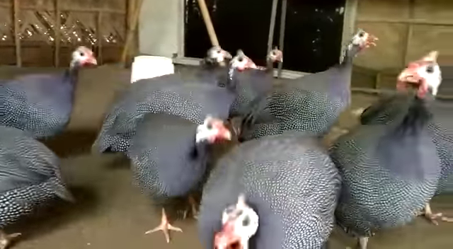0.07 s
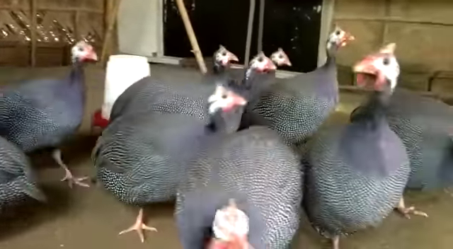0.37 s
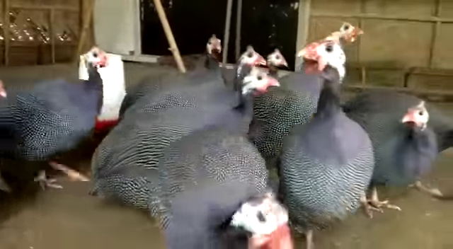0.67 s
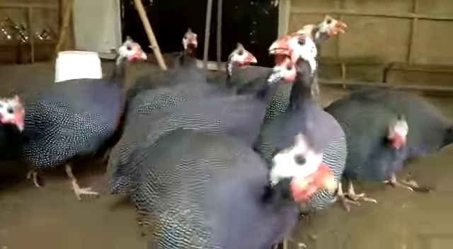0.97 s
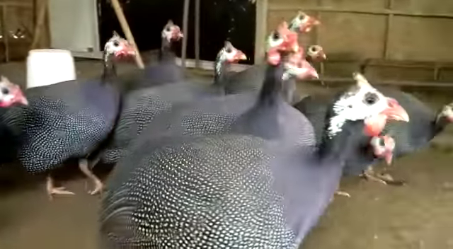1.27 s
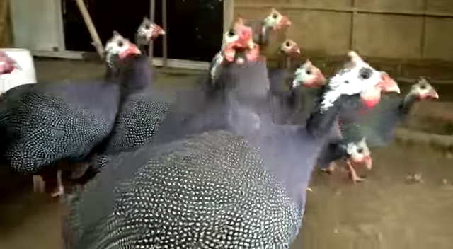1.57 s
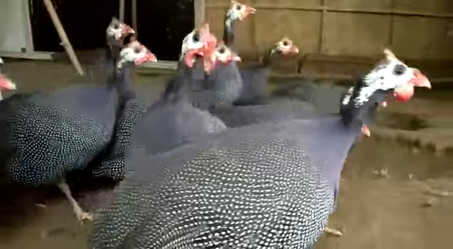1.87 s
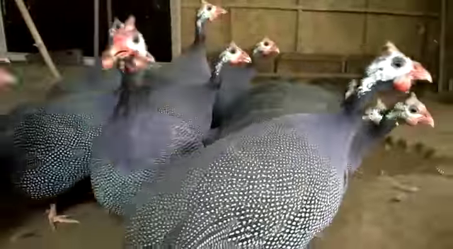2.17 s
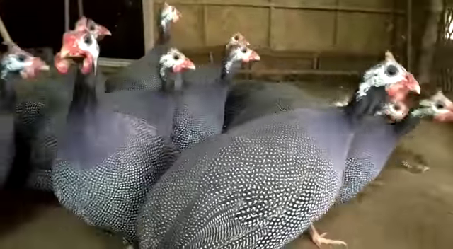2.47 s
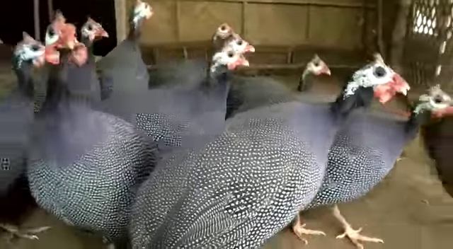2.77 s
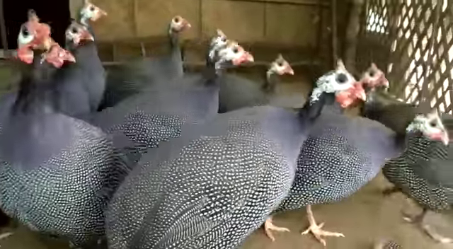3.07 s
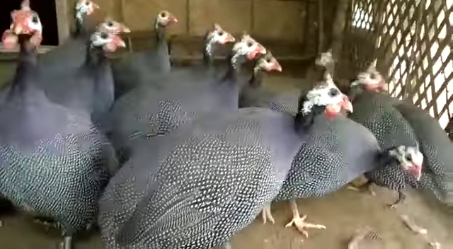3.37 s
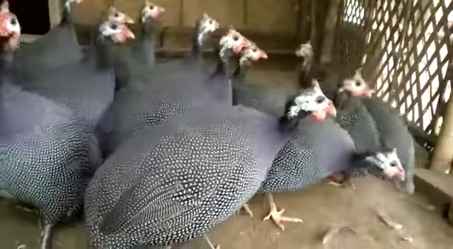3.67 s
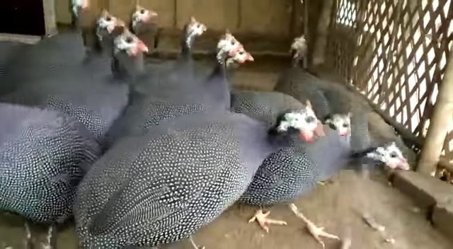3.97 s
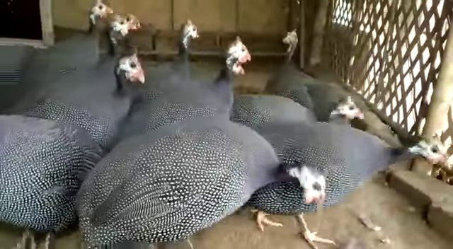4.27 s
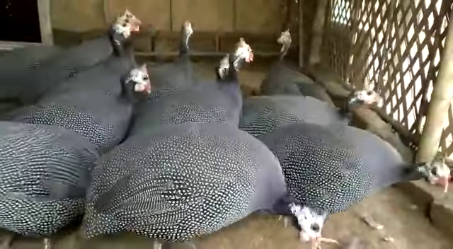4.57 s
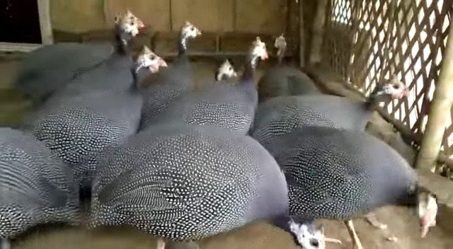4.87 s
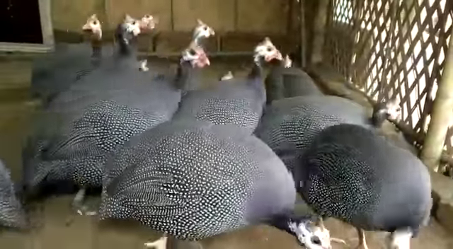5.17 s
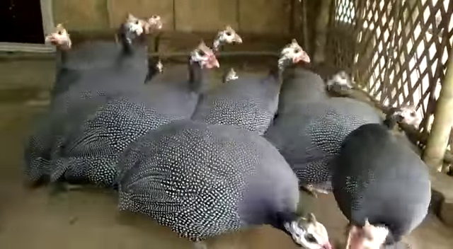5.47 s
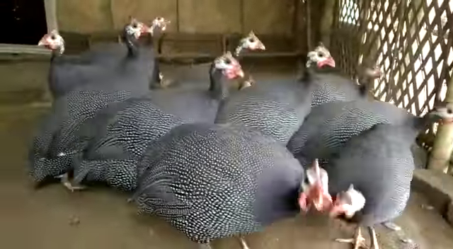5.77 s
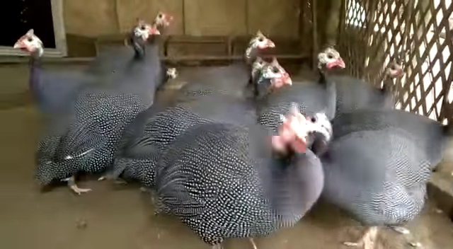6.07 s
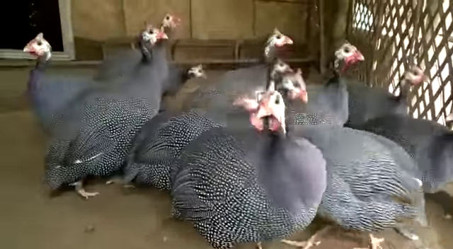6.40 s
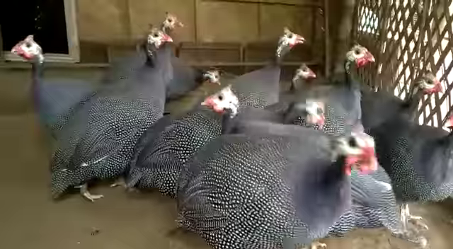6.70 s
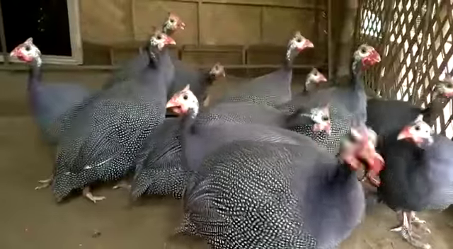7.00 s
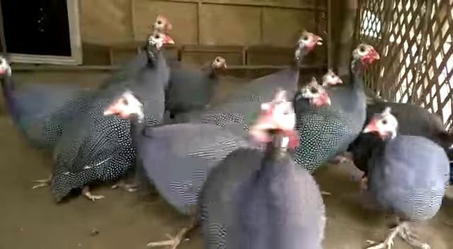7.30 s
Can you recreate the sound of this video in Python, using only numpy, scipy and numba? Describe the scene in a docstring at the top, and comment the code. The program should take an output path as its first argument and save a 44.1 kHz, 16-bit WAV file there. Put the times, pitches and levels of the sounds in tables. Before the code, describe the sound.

A flock of guinea fowl calls close to a stereo microphone in a small shed. Short, harsh, nasal rasps alternate irregularly with quick clucks and sharp, high chips, several a second, and a few start with a thin whistle. The calling carries on throughout with only brief gaps. The walls add a short reverberation, while faint cheeping from farther birds and a quiet low rumble lie underneath.

```python
"""A flock of guinea fowl calls in a small shed, close to a stereo microphone.
Each voice is a source and a filter: the syrinx emits a pulse train near 1 kHz, and windpipe, throat and
beak resonate. An open beak gives clucks and harsh chips; weakening two pulses in three triples the
period and gives a nasal rasp. Thin whistles lead into some calls. The walls reverberate briefly,
over far cheeping, a low rumble and a fading drone. A limiter holds down the highest peaks."""
import sys
import numpy as np
from scipy import signal
from scipy.fft import rfft, irfft, next_fast_len
from scipy.io import wavfile
from scipy.ndimage import uniform_filter1d, minimum_filter1d
from numba import njit

SR = 44100
rng = np.random.default_rng(int(sys.argv[2]) if len(sys.argv) > 2 else 0)


def wav_out(sig):
    """Save sig, one row per channel (or a flat mono array), as 16-bit PCM at SR to the path in sys.argv[1]."""
    wavfile.write(sys.argv[1], SR, np.round(np.clip(np.atleast_2d(sig).T, -1, 1) * 32767).astype(np.int16))


N = 328104

# Calls, at nominal pitch and level. Tripling and roughness run 0-1; lag is that of the left channel.
# Rasps, in which the half-closed throat opens once: t/s, length/s, time to opening/s, closed pitch/Hz,
# open pitch/Hz, open throat resonance/Hz, closed level/dB, open level/dB, tripling, roughness,
# relative fundamental level/dB, relative treble level/dB, lag/ms
RASP_CALLS = [(0.572, 0.092, 0.058, 1072, 1138, 1700, -27, -27, .8, 0.6, -7, -0.5, -.02),
              (0.917, 0.1, 0.032, 919, 995, 1860, -15.5, -18, 1, 0.16, -16, -8, -.07),
              (1.22, 0.2, 0.0077, 1037, 1013, 2880, -20, -30.5, 0.84, 0.47, -19, -7.5, 0),
              (1.35, 0.092, .05, 1106, 1057, 1900, -25, -29.5, 0.87, 0.47, -10, -4, .04),
              (1.743, 0.12, 0.063, 931, 997, 1850, -16, -17.5, 0.85, 0.23, -2.5, -6.5, .05),
              (1.916, 0.07, .031, 907, 944, 1280, -13, -25.5, 0.53, 0.17, -16, -4, -.09),
              (2.2, 0.09, 0.013, 1037, 1103, 1900, -33, -30.5, 1, 0.5, -10, -1, .07),
              (2.715, 0.12, 0.059, 937, 1063, 1690, -22.5, -17.5, .85, 0.36, -13, -5, .07),
              (3.425, 0.064, 0.029, 987, 957, 1240, -26, -20.5, 0.53, 0.51, -11, -10.5, .14),
              (3.572, 0.15, 0.053, 945, 1055, 1645, -28.5, -18, 1, 0.33, -29, -4, .07),
              (3.708, 0.098, 0.03, 929, 1131, 1770, -22, -21, 0.89, 0.44, -5, -0.5, .07),
              (3.925, 0.11, 0.059, 918, 1104, 1330, -29.5, -38, .8, 0.25, -11, -2.5, .07),
              (4.39, 0.13, 0.069, 972, 971, 2000, -20, -12.5, 0.7, 0.37, -17, -7, .2),
              (4.545, 0.078, 0.021, 1000, 1019, 1710, -24, -14, 0.86, 0.62, -15, -6, .2),
              (5.13, 0.089, 0.059, 934, 919, 1080, -26, -20.5, 0.8, 0.7, -5, -4, .05),
              (5.27, 0.1, .04, 925, 1019, 1550, -20, -24.5, 1, .18, -4, -0.5, -.05),
              (5.362, 0.096, .04, 932.6, 960.4, 1630, -22.5, -18.5, 0.5, 0.3, -15, -1, -.05),
              (5.487, 0.086, .065, 941, 1070, 1440, -27, -32.5, 1, 0.2, -24, -0.5, -.09),
              (5.964, 0.09, 0.034, 996, 1010, 1670, -21.5, -22.5, 0.8, 0.77, -9, 4.5, -.07),
              (6.035, 0.054, 0.038, 991, 942, 1400, -20.5, -28, 0.7, 0.49, -5, -8.5, -.07),
              (6.191, .13, 0.0493, 951.4, 963.4, 1640, -22, -18.5, 0.53, 0.3, -6.5, 0, .05),
              (6.666, 0.092, .044, 957, 1097, 1810, -20.5, -18, 0.99, .27, -12, 1, -.09),
              (6.745, 0.072, 0.049, 984, 1070, 1440, -22, -41, 0.95, 0.36, -16, -12, -.09),
              (6.981, 0.17, 0.06, 973, 1100, 1710, -21, -17.5, 0.96, 0.27, -17, 1.5, .04),
              (7.185, 0.069, .04, 938, 914, 1280, -21, -26.5, .7, 0.52, 5, -3, -.05),
              (7.319, 0.12, 0.041, 944, 1077, 1730, -21.5, -20.5, 1, 0.26, -10, 3, -.05)]
# Clucks: t/s, length/s, pitch/Hz, roughness, fundamental level/dB, overtone level/dB,
# beak resonance/Hz, top level/dB, lag/ms
CLUCK_CALLS = [(0.038, 0.062, 921, 0.55, -31, -20, 2080, -42, -0.14),
               (0.472, 0.047, 969, 0.49, -23, -15, 2880, -26.5, -0.09),
               (0.7, 0.026, 965, 0.27, -20.5, -14.5, 2600, -24, 0.02),
               (0.773, 0.018, 935, 0.16, -24, -36, 2730, -55, -0.18),
               (1.202, 0.075, 957, 0.33, -29, -24, 3380, -44.5, 0.07),
               (1.589, 0.037, 910, 0.16, -20, -39.5, 4950, -38, 0.0),
               (2.062, 0.03, 983, 0.32, -25, -35.5, 5300, -45, 0.0),
               (2.443, 0.044, 943.6, 0.46, -25, -14, 2470, -29, -0.18),
               (2.566, 0.038, 948, 0.43, -25.5, -34, 5230, -45.5, 0.07),
               (2.71, 0.015, 1021, 0.9, -27.5, -7, 2930, -19.5, 0.2),
               (2.87, 0.039, 966, 0.31, -26, -32.5, 5400, -48, 0.02),
               (2.941, 0.05, 1324, 0.15, -35.5, -44.5, 2920, -51, 0.02),
               (3.01, 0.083, 959, 0.51, -26.5, -21, 3330, -27.5, -0.05),
               (3.31, 0.182, 985, 0.19, -35, -26, 2700, -52, 0.14),
               (4.043, 0.019, 963, 0.38, -25, -10, 2850, -26.5, 0.18),
               (4.272, 0.056, 916, 0.4, -23.5, -36.5, 5200, -35.5, 0.05),
               (4.486, 0.072, 990, 0.66, -30.5, -21.5, 3170, -31, 0),
               (4.677, 0.033, 952, 0.1, -29.5, -15.5, 2750, -25, -0.07),
               (5.3, 0.064, 956, 0.59, -25, -17, 3560, -29.5, -0.07),
               (5.808, 0.03, 1000, 0.37, -21, -15, 2880, -20.5, -0.05),
               (6.835, 0.072, 941.6, 0.61, -24, -15.5, 2920, -28, 0.25),
               (7.146, 0.025, 898, 0.72, -22.5, -15, 3300, -23.5, -0.11)]
# Chips: t/s, length/s, level/dB, beak resonance/Hz, top level/dB, lag/ms
CHIP_CALLS = [(0.004, 0.023, -13.5, 2920, -24.5, 0.037), (0.073, 0.029, -18.5, 3000, -41, -0.031),
              (1.013, 0.026, -12, 3100, -39, -0.014), (1.27, 0.023, -13.5, 2840, -30, -0.095),
              (1.634, 0.025, -14, 3150, -29.5, 0.01), (2.182, 0.026, -12.5, 3150, -23.5, 0.14),
              (3.03, 0.027, -10.5, 2700, -24, -0.16), (3.567, 0.026, -10, 3240, -26.5, 0.096),
              (4.105, 0.022, -13, 3100, -27, -0.07), (5.118, 0.026, -11.5, 2780, -30, 0.32),
              (5.871, 0.023, -11, 2600, -26.5, 0.28), (6.352, 0.021, -12.5, 2950, -24.5, 0.0),
              (6.538, 0.026, -9, 3220, -20.5, 0.084)]
# Whistles: t/s, length/s, first pitch/Hz, last pitch/Hz, level/dB, roughness
WHISTLE_CALLS = [(0, 0.009, 2470, 3380, -6, 0.42), (0.458, 0.034, 1350, 1190, -29, .08),
                 (0.557, 0.043, 1278, 1132, -28.5, 0.04), (1.46, 0.071, 3510, 2960, -37.5, 0.23),
                 (3.297, 0.0405, 1149, 1012, -31, 0.07), (3.929, 0.053, 1233, 1276, -26.5, 0.02),
                 (5.517, .05, 1225, 1398, -26.5, 0.13), (2.171, 0.013, 2640, 3430, -14.5, 0.17),
                 (2.192, 0.011, 2920, 2940, -11.5, .1), (3.553, 0.0214, 2690, 3440, -22, 0.37),
                 (5.105, 0.02, 2980, 3400, -22.5, 0.15), (1.006, 0.021, 3490, 4110, -21.5, 0.3),
                 (4.096, 0.0201, 3300, 3970, -19, 0.3), (6.342, 0.013, 4060, 3800, -17.5, 0.15),
                 (6.525, 0.021, 2570, 3920, -19, 0.5)]

# Filter curves of the voice, each f/Hz, gain/dB
NASAL_FILTER = [(500, -45), (760, -24), (900, 4), (1100, -3), (1300, -1), (1550, -2), (1900, 2), (2200, -3),
                (2800, 0), (3400, -14), (4500, -35)]  # middle band of a rasp
RASP_TREBLE_FILTER = [(2500, -57), (3500, -8), (4150, -5), (4650, 7), (5400, 2.5), (6300, -6),
                      (7500, -10.5), (8700, -3), (10200, -4), (11700, -9), (13200, -18.5), (15000, -31)]  # upper band of a rasp
CHEST_FILTER = [(150, -13), (280, -27), (375, 8.5), (500, -11), (700, -8.5), (900, 2.5), (1500, -23.5)]  # low partials that pass through the neck
FUNDAMENTAL_FILTER = [(350, -18), (600, -23), (780, -18), (930, -1), (1350, -1.5), (1600, -9), (2500, -54)]  # band around the pulse rate
OVERTONE_FILTER = [(700, -17), (1250, -71), (1600, 2), (1950, 0), (2400, 2), (3000, -5.5), (4100, -3),
                   (5100, -1.5), (6000, -10.5), (7500, -26)]  # harmonics of a cluck
CHIP_FILTER = [(700, -11.5), (1000, 7), (1350, 2), (1650, 4), (2300, 2), (2800, 0), (3400, 1.5),
               (4100, 6.5), (5300, 7), (6300, -5.5), (7500, -17)]  # body of a chip
BEAK_TOP_FILTER = [(4500, -33), (6600, -5.5), (7500, -10.5), (8300, 2.5), (9000, 7.5), (10000, -0.5),
                   (11500, -6.5), (13500, -13.5), (15500, -23)]  # highest band of clucks and chips

# Spectra of the background, each f/Hz, relative spectral density/dB
RUMBLE_SPECTRUM = [(25, 4.5), (50, 4), (80, 0.5), (130, -4), (250, -8), (500, -12), (1000, -27),
                   (2000, -59), (5000, -37), (8000, -34), (15000, -48)]
DRONE_SPECTRUM = [(58, -14), (73, 6), (100, 14), (140, -30)]
CHEEPING_SPECTRUM = [(1200, -7), (2100, -5.5), (2900, 1.5), (3900, 0.5), (4700, -9), (7000, -9.5),
                     (9000, -7), (14000, -23)]
# Envelopes of the background, each t/s, relative level/dB
RUMBLE_ENVELOPE = [(0, -50.5), (2.1, -50.5), (7.44, -54.5)]
DRONE_ENVELOPE = [(0, -52), (1.4, -53), (2.1, -70)]
CHEEPING_ENVELOPE = [(0, -47.5), (1.5, -40.5), (2.4, -40.5), (3.25, -41.5), (4.8, -43.5), (4.95, -43.5),
                     (5.08, -46), (7.44, -36.5)]
# Reverberation of the shed by band: f/Hz, T60/s, relative level/dB
SHED_BANDS = [(410, 0.21, 2), (690, 0.45, -16.5), (1160, 0.16, -3.5), (2130, 0.23, -4), (3240, 0.26, -1.5),
              (4630, 0.2, -0.5), (8200, 0.21, 2), (14200, 0.11, 6)]
# Polarity of a side signal in the left and right channels
SIDE_SIGN = np.array([[1], [-1]])


def amp(db):
    """Amplitude ratio of a level in decibels."""
    return 10 ** (np.asarray(db) / 20)


def unit(x):
    """Normalisation to an rms of 1."""
    return x / np.sqrt(np.mean(x ** 2))


def steady(x):
    """Running normalisation: the short-term rms stays at 1 and single pulses survive."""
    return x / np.sqrt(np.abs(uniform_filter1d(x ** 2, size=600)) + 1e-12)


def colour(x, curve):
    """Zero-phase filtering by a curve (f/Hz, gain/dB), falling 12 dB an octave below its first point."""
    n = next_fast_len(len(x) + 1024)
    hz, db = np.transpose(curve)
    freqs = np.maximum(np.fft.rfftfreq(n, 1 / SR), 1)
    gain = amp(np.interp(np.log(freqs), np.log(hz), db)) * np.minimum(freqs / hz[0], 1) ** 2
    return irfft(rfft(x, n) * gain, n)[:len(x)]


@njit
def resonance(x, hz, width_hz):
    """A driven, damped resonator of moving frequency, as a state-variable band-pass."""
    y, band_state, low_state = np.empty(len(x)), 0., 0.
    for i in range(len(x)):
        g, damping = np.tan(np.pi * hz[i] / SR), width_hz / hz[i]
        band = (band_state + g * (x[i] - low_state)) / (1 + g * (g + damping))
        band_state, low_state = 2 * band - band_state, low_state + 2 * g * band
        y[i] = damping * band
    return y


def walk(n, rate_hz):
    """Random modulation: interpolated Gaussian values with a standard deviation near 1."""
    steps = np.arange(n) * rate_hz / SR
    knots = int(steps[-1]) + 2
    return 1.238 * np.interp(steps, np.arange(knots), rng.standard_normal(knots))


def clock(length):
    """Uniform sampling times over a length in seconds."""
    return np.arange(int(length * SR)) / SR


def gate(t, attack_s, release_s):
    """A raised-cosine envelope for the onset and end of a call."""
    ramp = np.clip(np.minimum(t / attack_s, (t[-1] - t) / release_s), 0, 1)
    return np.sin(np.pi / 2 * ramp) ** 2


def level_db(envelope):
    """Linear interpolation of an envelope (t/s, level/dB) over the scene."""
    return np.interp(np.arange(N) / SR, *np.transpose(envelope))


def add(out, sound, start, lag_ms=0):
    """Superposition of a call, with a difference in arrival time between the two channels."""
    for channel, sign in enumerate((1, -1)):
        at = max(int(start * SR) + round(sign * lag_ms * SR / 2000), 0)
        part = sound[:max(N - at, 0)]
        out[channel, at:at + len(part)] += part


def rumble(trim_db=1, side_gain=0.2):
    """Low filtered noise with faint air above it, largely coherent between the channels."""
    mid, side = (unit(colour(rng.standard_normal(N), RUMBLE_SPECTRUM)) for _ in range(2))
    return (mid + side_gain * side * SIDE_SIGN) * amp(level_db(RUMBLE_ENVELOPE) + trim_db)


def drone():
    """A distant drone of narrow-band noise, in phase in both channels, that dies away early."""
    return unit(colour(rng.standard_normal(N), DRONE_SPECTRUM)) * amp(level_db(DRONE_ENVELOPE))


def far_cheeping(trim_db=-1, flicker_db=0.92, width_hz=180.):
    """Distant birds merge into incoherent noise with a wandering resonance and a flickering level."""
    centre_hz = 3200 * amp(2.25 * walk(N, 19))
    cheeps = [unit(colour(noise + 0.5 * resonance(noise, centre_hz, width_hz), CHEEPING_SPECTRUM))
              for noise in rng.standard_normal((2, N))]
    return np.array(cheeps) * amp(level_db(CHEEPING_ENVELOPE) + trim_db + flicker_db * walk(N, 34))


def shed_reverberation(dry, gap_s=0.0019, build_s=0.0013):
    """Reflections from floor and walls form a diffuse field; each band decays exponentially."""
    t = clock(.6)
    log_centres = np.log([row[0] for row in SHED_BANDS])
    freqs = np.maximum(np.fft.rfftfreq(len(t), 1 / SR), 1)
    mid, side = rfft(rng.standard_normal((2, len(t))))
    coherence = np.sinc(freqs / 3200)  # long waves reach both channels alike
    field = (mid * np.sqrt(1 + coherence) + SIDE_SIGN * side * np.sqrt(1 - coherence)) / np.sqrt(2)
    response = 0
    for share, (_, t60, db) in zip(np.eye(len(SHED_BANDS)), SHED_BANDS):
        decay = amp(-60 * t / t60) * np.clip((t - gap_s) / build_s, 0, 1)
        band = irfft(field * np.interp(np.log(freqs), log_centres, share), len(t))
        response = response + amp(db) * band * decay / np.sqrt(np.sum(decay ** 2))
    return signal.fftconvolve(dry, response, axes=1)[:, :N]


def windpipe(x, ripple_db=7.5, mean_delay_s=.002):
    """Close-set tube resonances ripple both the gain and the group delay, smearing each pulse."""
    n = next_fast_len(len(x) + 1024)
    freqs = np.fft.rfftfreq(n, 1 / SR)
    ripple = np.interp(freqs, np.linspace(0, SR / 2, 60), rng.uniform(-1, 1, 60))
    phase = -2 * np.pi * np.cumsum(mean_delay_s * (1 + ripple)) * SR / n
    return irfft(rfft(x, n) * amp(ripple_db * ripple) * np.exp(1j * phase), n)[:len(x)]


def syrinx(hz, tripling, rough, jitter, scatter_db):
    """A pulse train drives the windpipe; roughness scales its jitter, shimmer and breath noise."""
    n = len(hz)
    cycles = np.cumsum(hz * (1 + jitter * rough * walk(n, 700))) / SR
    cycle = cycles.astype(int)
    # weakening two pulses in three puts partials at multiples of a third of the pulse rate
    size = np.where(cycle % 3, np.clip(1 - tripling, .02, 1) ** 1.3, 1)
    size = size * amp(scatter_db * rough * rng.standard_normal(cycle[-1] + 1)[cycle])
    offset = cycles % 1 - .5
    pulses = np.sinc(offset * SR / hz * 3 / 4) * np.cos(np.pi * offset) ** 2  # band-limited
    puff_decay = np.exp(-((cycles + .5) % 1) / 0.44)  # a puff of air follows each pulse
    puffs = puff_decay * uniform_filter1d(size, size=40) * rng.standard_normal(n)
    return windpipe(steady(size * pulses) + rough * steady(puffs))


def whistle(length, first_hz, last_hz, db, rough, overtone_db=-23):
    """A nearly pure glide, roughened by random frequency and amplitude modulation."""
    t = clock(length)
    hz = np.linspace(first_hz, last_hz, len(t)) * (1 + 0.086 * rough * walk(len(t), 1580))
    phase = 2 * np.pi * np.cumsum(hz) / SR
    tone = np.sin(phase) + amp(overtone_db) * (np.sin(2 * phase) + np.sin(3 * phase))
    flutter = 1 + 1.4 * rough * walk(len(t), 1510)
    return amp(db) * unit(tone * flutter) * gate(t, attack_s=0.0097, release_s=0.0055)


def chip(length, db, beak_hz, top_db, pitch_hz=1000, beak_width_hz=650., sweep=0.19):
    """A swept formant on a harsh, breaking voice: the beak resonance falls, then springs back."""
    t = clock(length)
    arch = np.sin(np.pi * t / t[-1])
    hz = pitch_hz * (1 + 0.1504 * np.exp(-t / 0.00661))
    source = syrinx(hz, tripling=1.0, rough=0.58, jitter=0.0804, scatter_db=3.5)
    beak = resonance(source, beak_hz * (1 - sweep * (arch - .5)), beak_width_hz)
    body = amp(db) * steady(colour(beak + 0.18 * source, CHIP_FILTER))
    top = amp(top_db) * unit(colour(source, BEAK_TOP_FILTER))
    return (body + top) * arch ** 2


def cluck(length, pitch_hz, rough, fundamental_db, overtone_db, beak_hz, top_db,
          beak_width_hz=1500., sag_db=4):
    """A stationary beak formant shapes the harmonics of a short note whose pitch drops into place."""
    t = clock(length + 0.0017)
    # a soft note with the beak shut swells and settles more slowly
    slowness = amp(0.3 * max(fundamental_db - overtone_db, 0))
    hz = pitch_hz * (1 + 0.22 * np.exp(-t / (0.0061 * slowness)))
    source = syrinx(hz, tripling=0.037 + 0.86 * rough, rough=rough, jitter=.09, scatter_db=0)
    beak = resonance(source, np.full(len(t), float(beak_hz)), beak_width_hz) + 0.063 * source
    fundamental = amp(fundamental_db) * steady(colour(source, FUNDAMENTAL_FILTER))
    overtones = amp(overtone_db) * steady(colour(beak, OVERTONE_FILTER))
    top = amp(top_db) * steady(colour(source, BEAK_TOP_FILTER))
    envelope = gate(t, attack_s=0.01 * slowness, release_s=0.01) * amp(sag_db * (.5 - t / length))
    return (fundamental + overtones + top) * envelope


def rasp(length, opens_s, closed_hz, open_hz, open_throat_hz, closed_db, open_db, tripling, rough,
         fundamental_db, treble_db, opening_s=0.02015, tripling_s=0.0053, closed_throat_hz=1150,
         closed_beak_hz=5400, open_beak_hz=4500, beak_width_hz=1400., climb_per_s=.25):
    """Period tripling: as the throat opens, its formant moves across the partials of a nasal call."""
    t = clock(length)
    opening = .5 + .5 * np.tanh((t - opens_s) / opening_s)
    effort = walk(len(t), rate_hz=55.5)  # unsteady effort sways pitch and level together
    # the pitch starts high, settles, then creeps upward
    bend = .13 * np.exp(-t / 0.0063) + climb_per_s * (t - length / 2) + .011 * effort
    hz = (closed_hz + (open_hz - closed_hz) * opening) * (1 + bend)
    db = closed_db + (open_db - closed_db) * opening + 2 * effort
    tripling = tripling * (1 - np.exp(-t / tripling_s))  # the voice starts plain, then breaks
    source = syrinx(hz, tripling, rough * (1 - 0.39 * opening), jitter=0.078, scatter_db=6.5)

    settling_hz = closed_throat_hz * (1 + 0.15 * np.exp(-t / 0.014))
    throat_hz = settling_hz + (open_throat_hz - settling_hz) * opening
    width_hz = 620 * (np.median(throat_hz) / 1600) ** 2  # a half-closed throat rings narrowly
    ring = resonance(resonance(source, throat_hz, width_hz), throat_hz, width_hz)
    nasal = steady(colour(ring + 0.22 * source, NASAL_FILTER))
    # the fundamental gives way to the tripled period as the throat opens
    fundamental_gain = amp(fundamental_db - 9 * tripling * opening)
    throat = steady(nasal + fundamental_gain * steady(colour(source, FUNDAMENTAL_FILTER)))

    beak = resonance(source, closed_beak_hz + (open_beak_hz - closed_beak_hz) * opening, beak_width_hz)
    hissy = source * (1 + 0.15 * rng.standard_normal(len(t)))
    treble = steady(colour(hissy + 0.41 * beak, RASP_TREBLE_FILTER)) * amp(treble_db - 2 - 2.5 * opening)
    # the lowest partials pass through the neck and follow the level only in part
    chest = steady(colour(source, CHEST_FILTER)) * tripling * amp(-27 + 6 * opening + 0.86 * db)
    return (amp(db) * (throat + treble) + chest) * gate(t, attack_s=0.021, release_s=0.033)


def scene():
    """Superposition of the birds' direct sound, its reverberation and the background."""
    birds = np.zeros((2, N))
    for table, call in ((RASP_CALLS, rasp), (CLUCK_CALLS, cluck), (CHIP_CALLS, chip)):
        for start, *voice, lag_ms in table:
            add(birds, call(*voice), start, lag_ms)
    for start, *voice in WHISTLE_CALLS:
        add(birds, whistle(*voice), start)
    return birds + shed_reverberation(birds) + rumble() + far_cheeping() + drone()


def record(dry, ceiling_db=0.5, cutoff_hz=16000):
    """Peak limiting dips the gain for a few ms around the highest peaks; a low-pass cuts the top."""
    needed = np.minimum(amp(ceiling_db) / (np.abs(dry).max(axis=0) + 1e-9), 1)
    gain = uniform_filter1d(minimum_filter1d(needed, size=300), size=300)
    return signal.sosfilt(signal.ellip(10, .2, 80, cutoff_hz, fs=SR, output="sos"), dry * gain)


dry = scene()
out = record(dry)
wav_out(out)
```